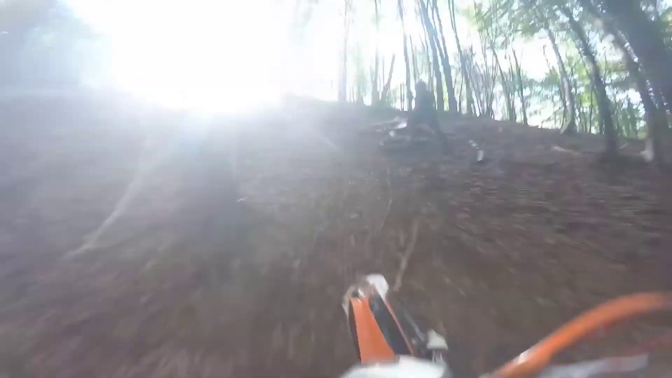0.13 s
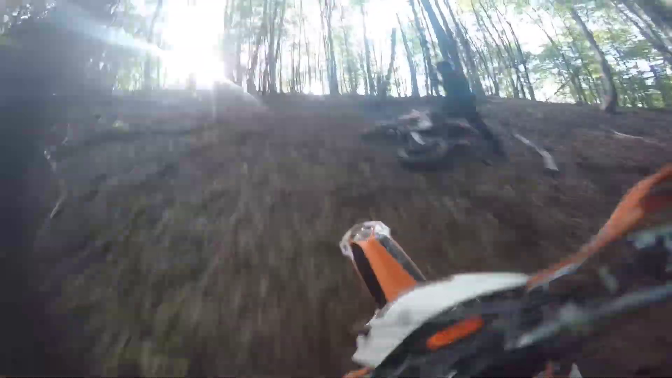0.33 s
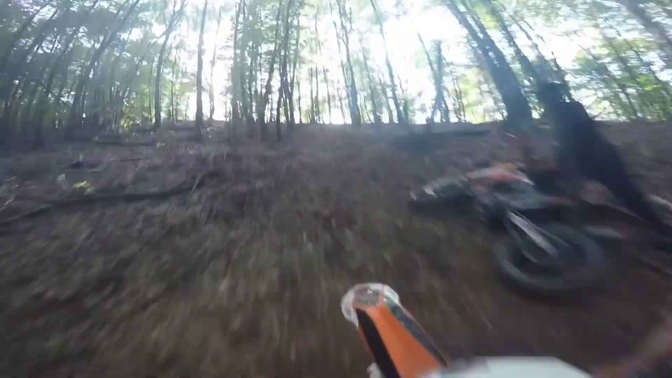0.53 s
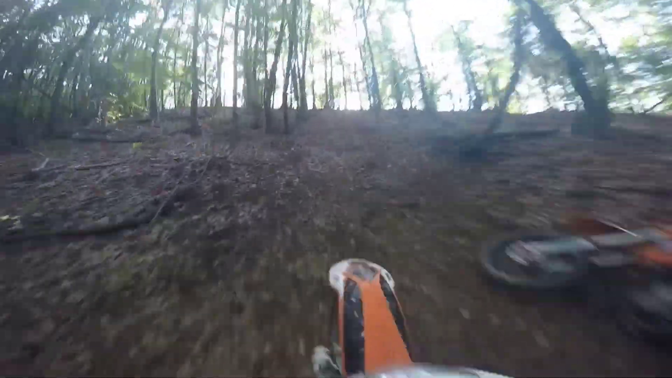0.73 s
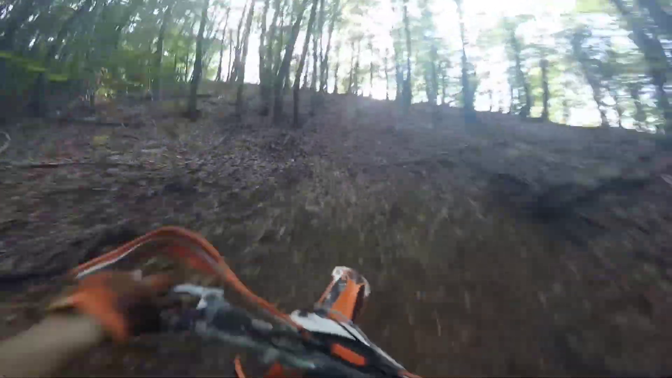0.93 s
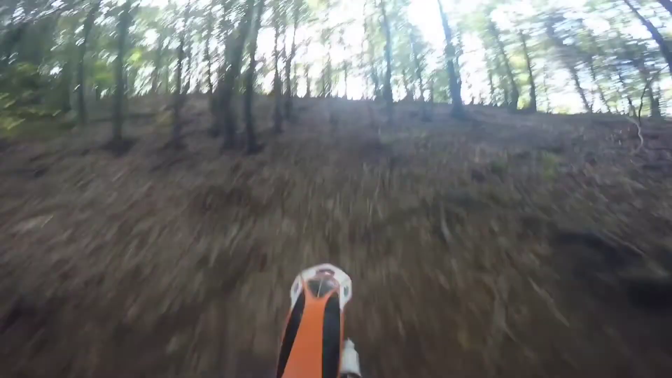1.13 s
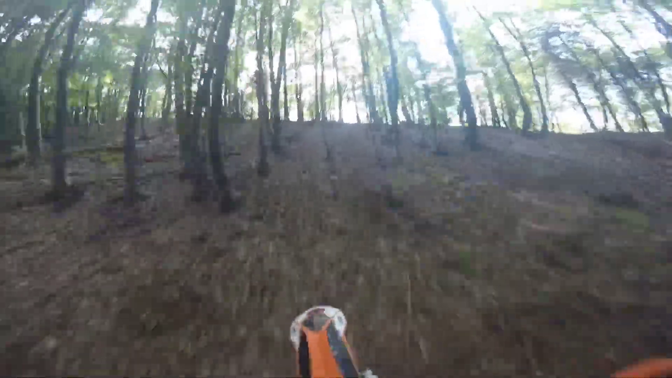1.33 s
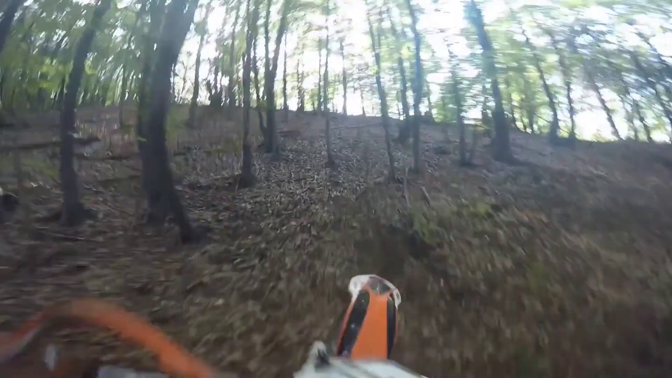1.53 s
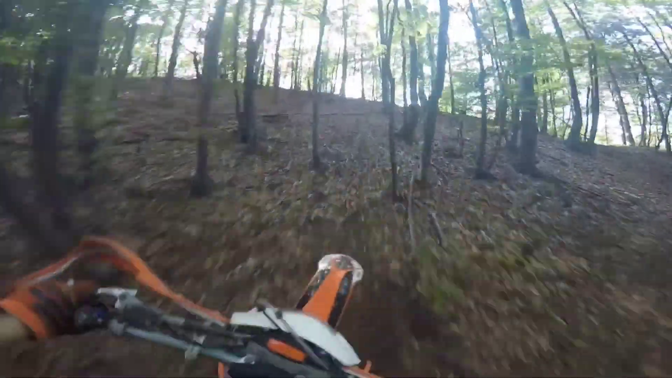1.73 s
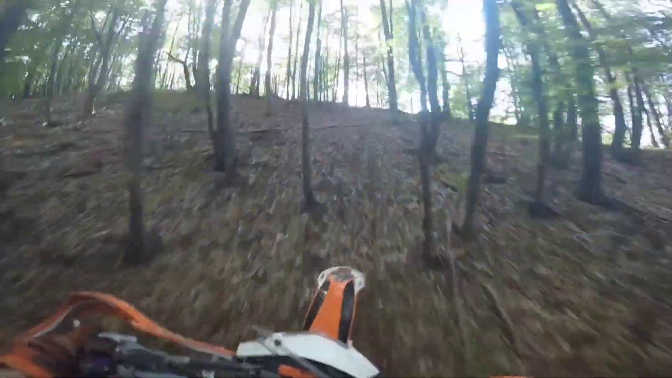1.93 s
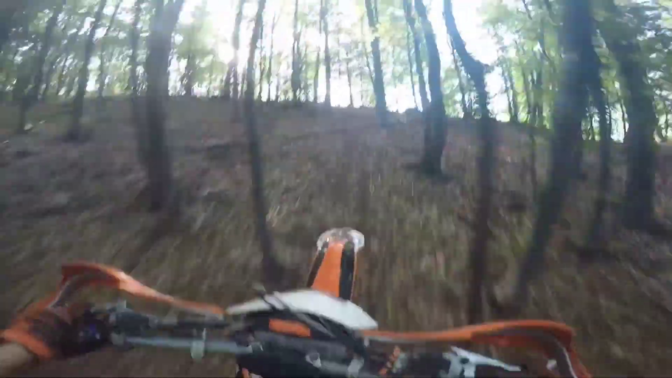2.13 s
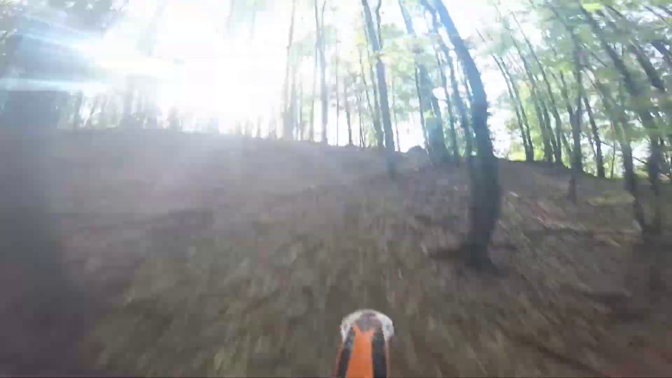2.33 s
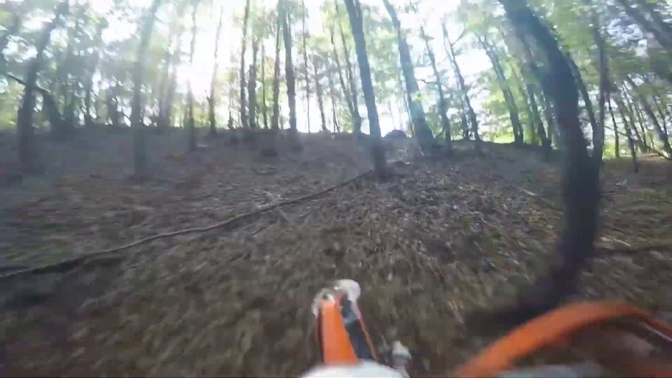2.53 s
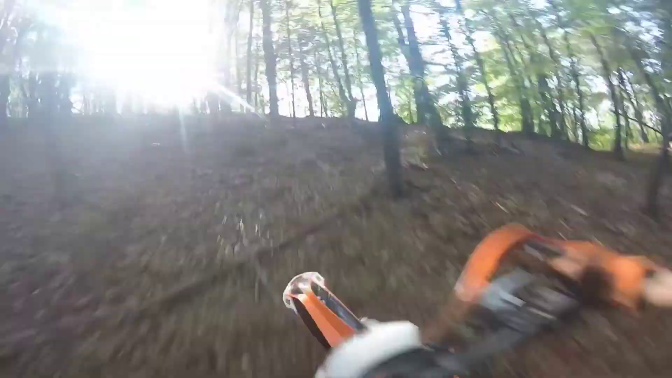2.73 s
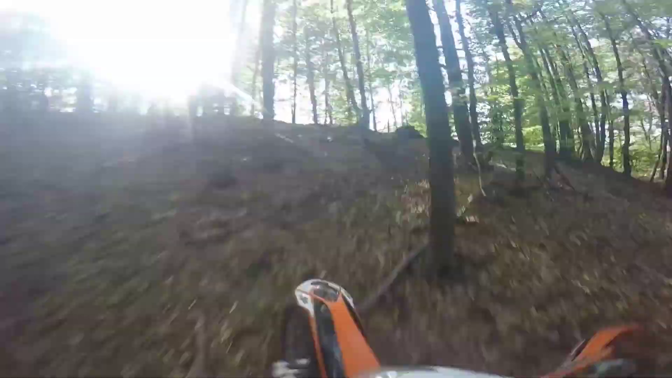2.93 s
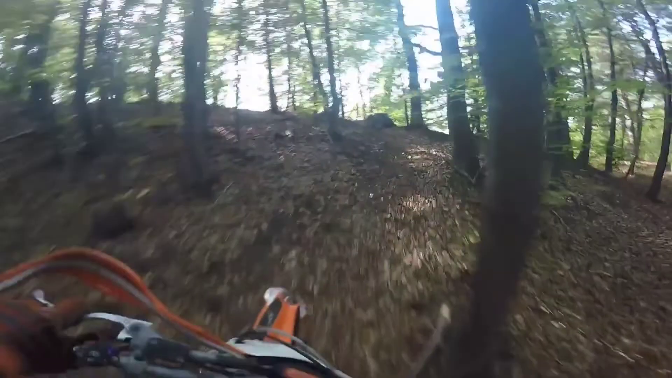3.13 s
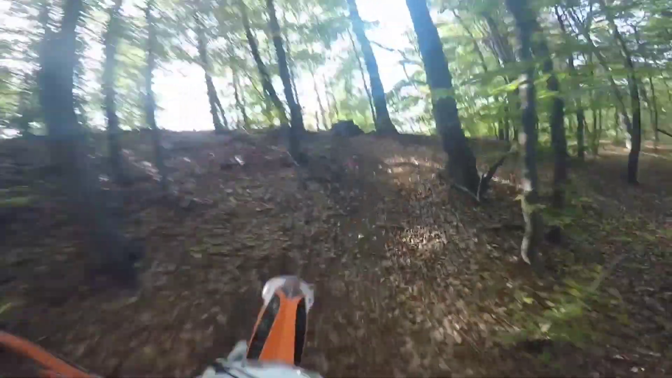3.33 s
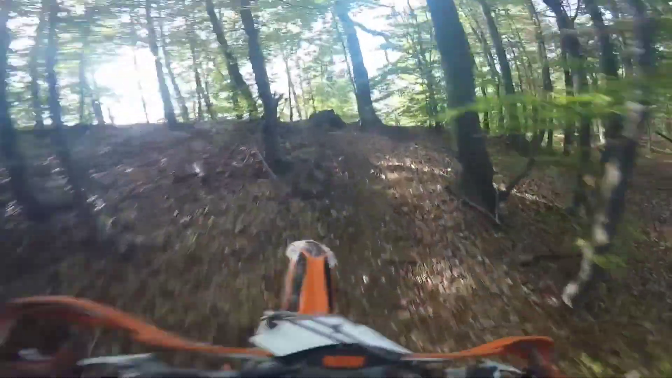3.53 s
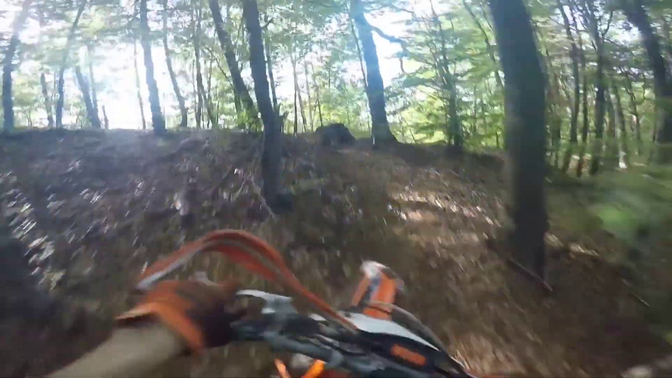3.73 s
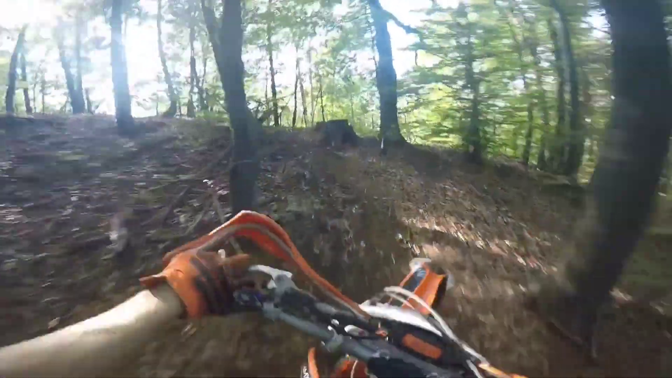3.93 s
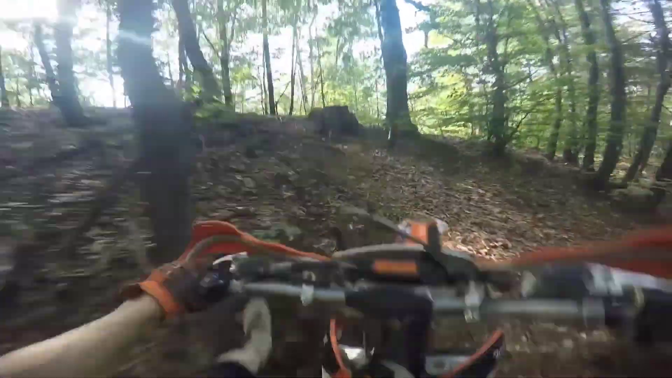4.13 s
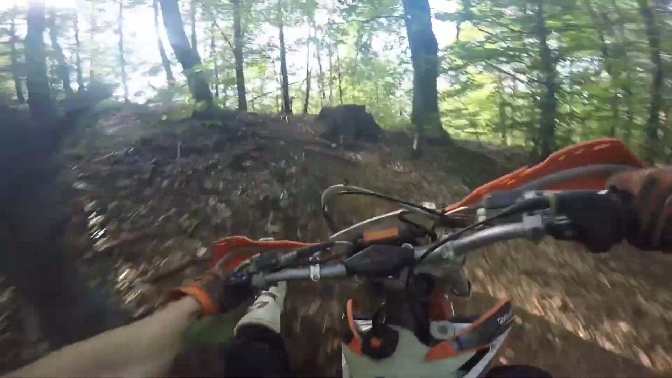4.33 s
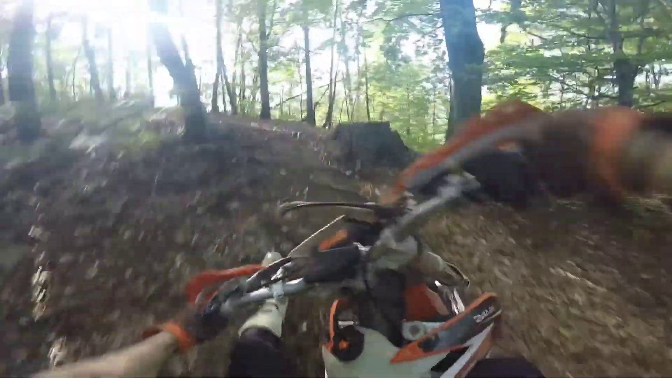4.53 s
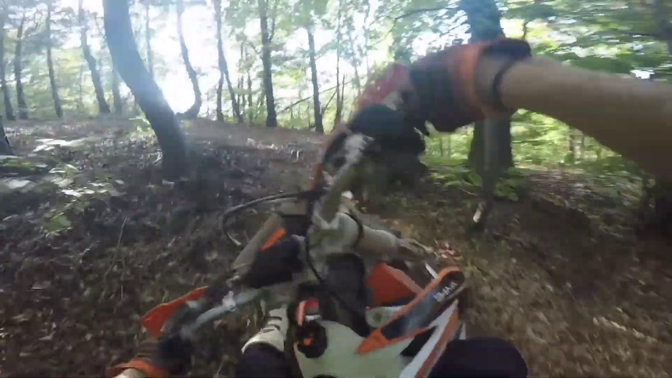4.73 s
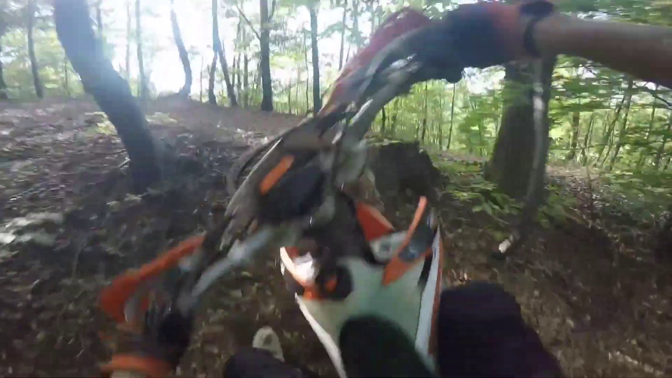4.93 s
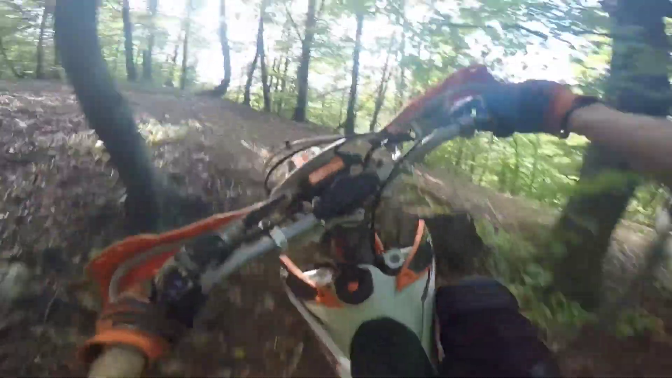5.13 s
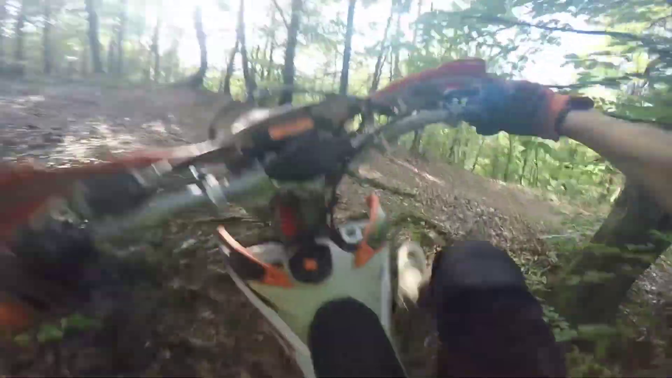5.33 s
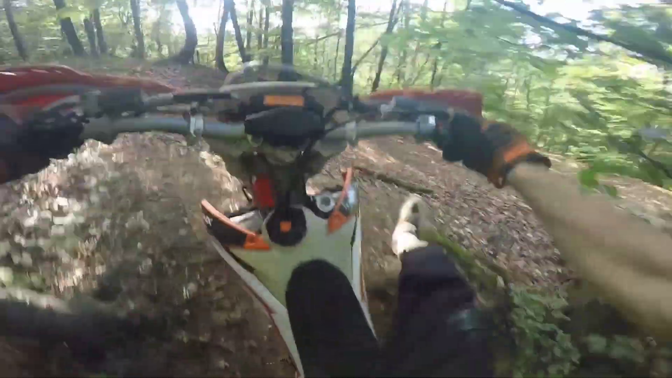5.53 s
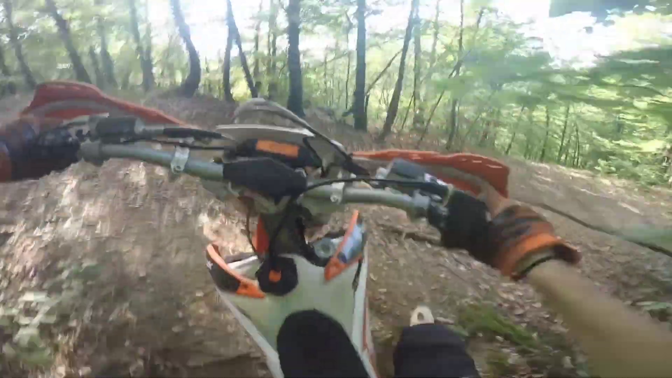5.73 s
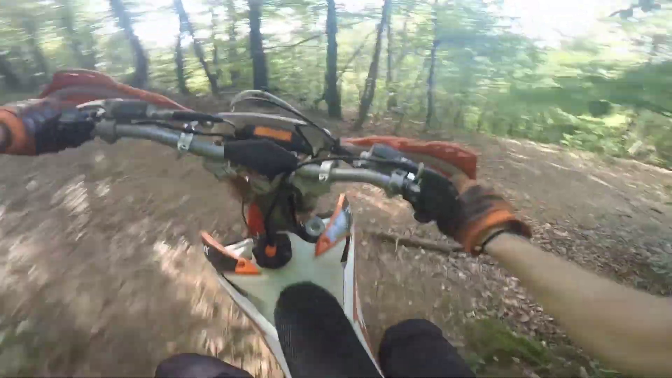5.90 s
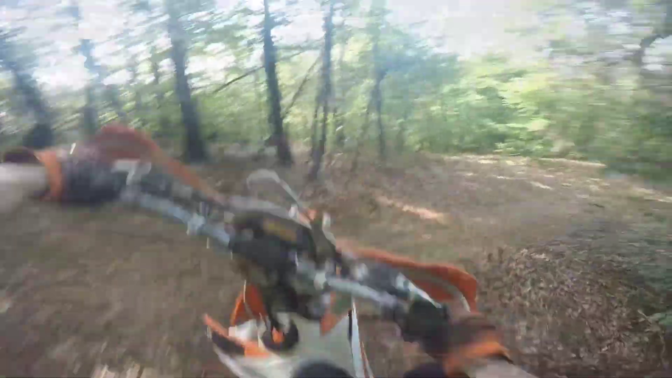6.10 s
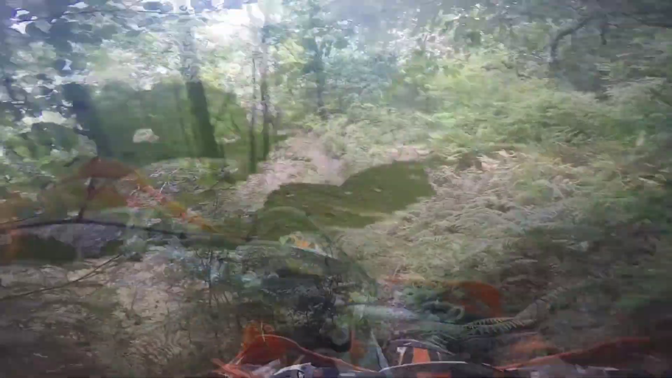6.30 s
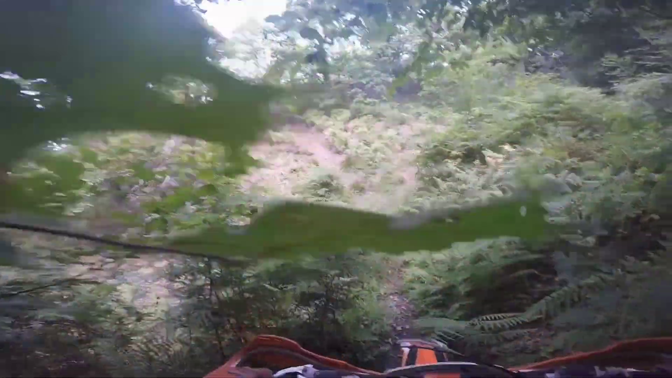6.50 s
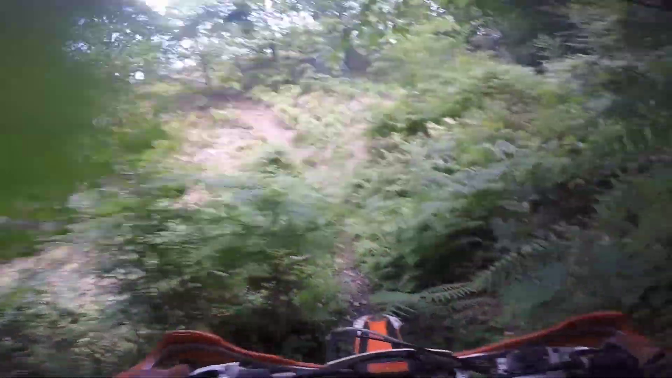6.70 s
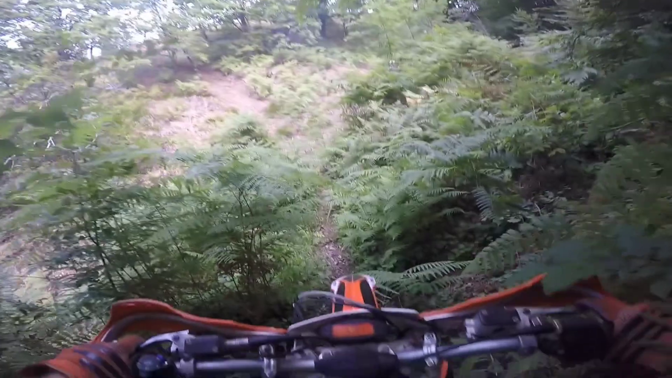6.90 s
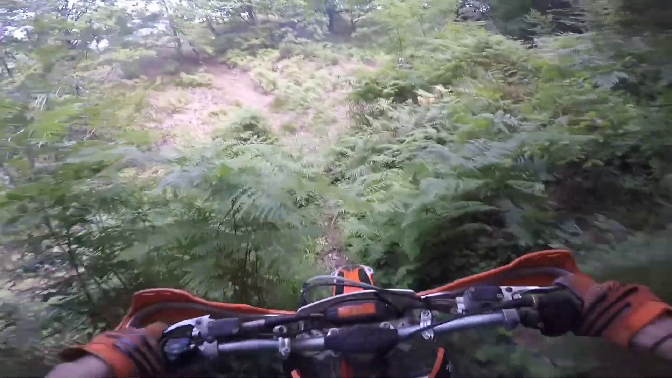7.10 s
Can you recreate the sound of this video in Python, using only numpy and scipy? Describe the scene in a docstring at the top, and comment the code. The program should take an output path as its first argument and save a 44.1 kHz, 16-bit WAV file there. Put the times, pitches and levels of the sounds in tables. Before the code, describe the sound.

Close, rough onboard sound of a small off-road motorcycle in the woods: a buzzing, screaming exhaust wavers up and down, then falls to slow, separate, rattling pops. Short bursts of throttle follow, with deep camera wobbles, plastic knocks and gritty crunches under the tyres. Finally the engine putters and blips again while foliage slaps and hisses on both sides.

```python
"""Two-stroke dirt bike on a wooded hill

A dirt bike climbs, heard from a camera on the rider's helmet. It revs in waves for three seconds,
drops to an uneven putter, bumps over the crest and rolls into ferns. Each firing sends a pulse into
the resonant exhaust pipe and strikes the expansion chamber and engine case, heard as filtered clicks
and noise. Air rumble and crank shake, damped swings and rings of the camera after bumps, gritty
bursts under the tyres and clouds of tiny leaf slaps make up the rest."""
import sys
import numpy as np
from scipy import signal
from scipy.fft import irfft
from scipy.io import wavfile
from scipy.ndimage import uniform_filter1d

SR = 44100
rng = np.random.default_rng(int(sys.argv[2]) if len(sys.argv) > 2 else 0)


def store_pcm(level_fs):
    """Save levels as 16-bit WAV."""
    pcm = np.round(np.clip(level_fs, -1, 1) * 32767).astype(np.int16)
    wavfile.write(sys.argv[1], SR, np.atleast_2d(pcm).T)


N = 320166
T = np.arange(N) / SR  # time of each sample, s
TAPS = 8192  # grid length for filter design
HZ = np.fft.rfftfreq(TAPS, 1 / SR)


def gain_of(db):
    """Level: converts decibels to an amplitude factor."""
    return 10 ** (np.asarray(db) / 20)


def curve(rows):
    """Linear interpolation: the second column of a timed table, at every sample."""
    rows = np.asarray(rows)
    return np.interp(T, rows[:, 0], rows[:, 1])


def add(mix, s, sound):
    """Superposition: adds a sound into the mix at time s."""
    part = mix[round(s * SR):][:len(sound)]
    part += sound[:len(part)]


def slope(points):
    """Spectral envelope: gain at each frequency from (Hz, dB) points."""
    hz, db = np.transpose(points)
    return gain_of(np.interp(np.log(HZ + 1), np.log(hz), db))


def bells(modes):
    """Resonance: steep-sided peaks summed in power, each with its width in Hz at half amplitude."""
    power = 0
    for hz, width, db in modes:
        power = power + gain_of(db) ** 2 / (1 + (2.0 * (HZ - hz) / width) ** 2) ** 2
    return np.sqrt(power)


def colour(x, gain, delay=0):
    """Minimum-phase filtering with a given gain, plus a group delay in s at each frequency."""
    log_gain = np.log(np.maximum(gain, 1e-5))
    # the Hilbert transform of the log gain gives the causal phase
    phase = -signal.hilbert(np.r_[log_gain, log_gain[-2:0:-1]]).imag[:len(HZ)]
    # phase is the running integral of group delay
    phase = phase - 2 * np.pi * np.cumsum(delay * np.ones(len(HZ))) * HZ[1]
    response = irfft(np.exp(log_gain + 1j * phase))[:TAPS // 2]
    return signal.oaconvolve(x, response)[:len(x)]


def evened(x):
    """Normalization: scales to rms 1."""
    return x / np.sqrt(np.mean(x ** 2) + 1e-20)


def steadied(x, lo, hi, size=3600):
    """Level control: divides by the slow rms of one band, so that another rule can set its level."""
    band = signal.butter(2, [lo, hi], "band", fs=SR, output="sos")
    power = signal.sosfilt(band, x) ** 2
    slow_power = uniform_filter1d(uniform_filter1d(power, size), size)
    return x / np.sqrt(abs(slow_power) + 1e-14)


def clicks(times, sizes):
    """Band-limited sampling: windowed-sinc impulses at times between samples."""
    at = np.round(times * SR).astype(int)[:, None] + np.arange(-8, 9)
    offset = at - times[:, None] * SR
    shapes = sizes[:, None] * np.sinc(offset) * np.cos(np.pi * offset / 18) ** 2
    return np.bincount(np.clip(at, 0, N).ravel(), shapes.ravel(), N + 1)[:N]


def lagged(x, seconds):
    """First-order relaxation: follows x with a time constant."""
    keep = np.exp(-1 / (seconds * SR))
    return x[0] + signal.lfilter([1 - keep], [1, -keep], x - x[0])


def ferns(per_s=800, spread_db=2.0):
    """Shot noise: many tiny random leaf slaps blend into a swish."""
    # fronds brushing the bike: time_s, level_db
    brushing = [(5.8,-92),(5.98,-64),(6.2,-50.5),(6.5,-48.5),(6.6,-43),(6.75,-35),(6.9,-42.5),(7.26,-41)]
    # spectral envelope of the leaves: frequency_hz, relative_level_db
    leaf_colour = [(400,14),(950,8.5),(1250,-1),(1650,12),(2200,-15),(4000,8),(5100,-27),(5700,14),(6400,-9),(12000,-2),(15000,-10)]
    struck = rng.random(N) < per_s / SR
    boost_db = spread_db * np.minimum(rng.exponential(1, N), 4)
    slaps = struck * rng.standard_normal(N) * gain_of(boost_db)
    return gain_of(curve(brushing)) * evened(colour(slaps, slope(leaf_colour)))


def crunches(t60=0.092, width_hz=950):
    """Fracture noise: stones and sticks give way in short, decaying, gritty bursts."""
    # stones and sticks under the tyres: start_s, relative_level_db, centre_hz
    breaks = [(5.196,-37,1280),(5.226,-41,1536),(5.268,-32.5,1075),(5.335,-50,1900),(5.896,-37.5,602),(5.925,-41,544),(5.99,-41,594),(6.01,-45,1510),(6.023,-40,1290),(6.064,-37.5,850),(6.077,-50,1200),(6.103,-41,890),(6.128,-51,1083),(6.728,-26.5,2640)]
    out, t = np.zeros(N), np.arange(SR // 8) / SR
    for s, db, hz in breaks:
        grit = rng.standard_normal(len(t)) * rng.exponential(1, len(t)) * gain_of(-60 * t / t60)
        burst = colour(grit, bells([(hz, width_hz, 0)]) * HZ / (HZ + 300))
        onset_rms = burst[:SR // 70].std()
        add(out, s, gain_of(db - 4.0) * burst / onset_rms)
    return out


def buffet(mount_hz=44, mount_width_hz=7):
    """Turbulence and resonance: air rumbles; near the camera mount's resonance crank shake joins in."""
    # air and frame shake on the helmet: time_s, level_db
    shaking = [(0,-16.5),(0.6,-18.5),(0.8,-25.5),(1.1,-14.5),(1.31,-35),(1.55,-29.5),(2.2,-22.5),(3.45,-22),(4.15,-21.5),(4.41,-15),(4.9,-20.5),(5.07,-31.5),(5.45,-20),(5.85,-21.5),(6.03,-42.5),(6.45,-26.5),(6.6,-29.5),(6.92,-30),(7.08,-25.5)]
    # spectral envelope of the air: frequency_hz, relative_level_db
    air_colour = [(10,-21),(22,6.5),(40,5),(55,-6.5),(75,-9.5),(110,-27.5),(200,-32.5),(400,-34),(900,-43.5),(3000,-88)]
    air = steadied(colour(rng.standard_normal(N), slope(air_colour)), 20, 120)
    shake = np.sqrt(2) * np.sin(2 * np.pi * np.cumsum(speed()) / SR)
    # the crank's share of the power
    share = np.clip(0.44 / (1 + ((speed() - mount_hz) / mount_width_hz) ** 4), 0, 1)
    return gain_of(curve(shaking)) * (np.sqrt(1 - share) * air + np.sqrt(share) * shake)


def jolts(rise_cycles=0.78, tail_db=-16, tail_cycles=11):
    """Damped oscillation: a bump sets the camera swinging on its mount for a few cycles."""
    # bumps that rock the camera: start_s, relative_level_db, ring_hz
    bumps = [(0.727,-2,37.18),(1.126,2,36.5),(1.128,-12.5,109),(2.448,-3,37),(3.389,1.5,35.7),(4.211,-3.5,44),(4.491,-8,41.9),(4.502,-2.5,119),(4.641,-11,39.8),(4.768,1,36.6),(4.914,3.5,37.3),(5.511,-31,43),(5.764,0,86),(5.768,2.5,38.3)]
    out, t = np.zeros(N), np.arange(SR // 3) / SR
    for s, db, hz in bumps:
        age = hz * t / rise_cycles
        surge = age ** 2 * np.exp(2 - 2 * age)
        tail = gain_of(tail_db - 60 * hz * t / tail_cycles)  # falls 60 dB in tail_cycles
        add(out, s, gain_of(db - 5.0) * (surge + tail) * np.sin(2 * np.pi * hz * t))
    return out


def knocks():
    """Modal ringing: short blows excite the plastic camera housing; each blow has its own brightness."""
    # hard knocks on the housing: start_s, peak_level_db, brightness_db_per_octave
    blows = [(1.131,-14,4),(4.505,-13.5,10.5),(4.527,-10,-19),(4.925,-12.5,-11),(5.531,-4.5,7.5),(5.761,-11.5,-2),(5.774,0.5,-4.5),(5.988,-20,1)]
    # modes of the housing: frequency_hz, relative_level_db, t60_s
    housing = [(94,-5,0.097),(138,8,0.063),(310,19.5,0.015),(557.8,-5,0.0095),(820,-10.5,0.015),(980,-16,0.034),(2600,-30,0.0077)]
    out, t = np.zeros(N), np.arange(SR // 6) / SR
    for s, db, bright in blows:
        ring = np.zeros(len(t))
        for hz, mode_db, t60 in housing:
            tilt_db = bright * np.log2(hz / 300)
            ring += gain_of(mode_db + tilt_db - 60 * t / t60) * np.sin(2 * np.pi * hz * t)
        add(out, s, -gain_of(db) * ring / abs(ring).max())
    return out


def speed(flywheel_s=0.04985):
    """Rotational inertia rounds off speed changes; crank turns per second, each with one firing."""
    # engine speed on the gas: time_s, firing_rate_hz
    revs = [(0.062, 141.8), (0.12, 150.5), (0.303, 135.9), (0.418, 161.6), (0.594, 171.2), (0.737, 114.6),
            (0.886, 135.7), (0.965, 163.8), (1.149, 171.8), (1.307, 119.6), (1.428, 152.3), (1.48, 143.3),
            (1.759, 173.7), (1.85, 174.4), (1.994, 126.1), (2.088, 127.0), (2.193, 160.4), (2.305, 170.3),
            (2.453, 126.9), (2.633, 154.2), (2.735, 167.7), (2.856, 165.0), (2.968, 118.0)]
    # engine speed near idle: time_s, firing_rate_hz
    putter = [(3.191,83),(3.42,69),(3.561,45),(3.97,78),(4.172,46),(4.469,47),(4.699,55),(4.859,61),(4.999,42),(5.482,34),(5.719,48),(5.9,39),(6.3,46),(6.631,60),(6.802,57),(7.019,36),(7.26,51)]
    size = max(1, round(flywheel_s * SR))
    return uniform_filter1d(curve(list(revs) + list(putter)), size, mode="nearest")


def load(open_s=0.05, shut_s=0.0067):
    """Asymmetric relaxation: the engine takes up load slowly and drops it quickly; gains in dB."""
    # spells on or off the throttle, against idle; below zero the bike coasts:
    # start_s, end_s, boom_db, bark_db, metal_db
    throttle = [(0,0.382,17,21,10),(0.38,0.54,17.5,17.5,8.5),(0.53,0.88,17,15.5,9.5),(0.887,1.15,15.5,20,8.5),(1.155,1.251,9.5,9.5,5.5),(1.283,1.53,8.5,13.5,3.5),(1.54,1.882,18,16.5,6),
                (1.878,2.77,15.5,20,9.5),(2.753,2.937,18,12.5,6.5),(2.943,3.227,5,5.5,7),(3.227,3.443,3.5,5,5.5),(3.54,3.953,15.5,18,3),(4.15,4.56,11,10.5,2.5),(4.573,4.9,11.5,20.5,5),
                (5.587,5.777,12.5,11,3),(5.816,6.0,0,9,-11.5),(6.01,6.55,-0.5,3.5,-4.5),(6.577,6.93,15,12,2),(6.947,7.06,8,10,4),(7.05,7.254,13,16,4.5)]
    asked = np.zeros((N, 3))
    for start, end, *dbs in throttle:
        asked[(T >= start - .005) & (T < end + .005)] = dbs
    return [np.minimum(lagged(db, open_s), lagged(db, shut_s)) for db in asked.T]


def firings():
    """Phase integration: one firing per crank turn, with the exhaust and clatter boost of each in dB."""
    # spells of harder or weaker firing: start_s, length_s, exhaust_boost_db, clatter_boost_db
    surges = [(2.905,.03,0,5.5),(2.968,.018,5,4),(3.076,.018,3,7),(3.134,.022,9,8),(3.191,.022,10.5,8),(3.258,.04,11.5,8.5),(3.327,.024,15,7),(3.388,.024,15,6.5),(4.17,.01,9.5,11),(4.214,.01,3,10),(4.259,.01,4,9),(4.362,.01,1,6),(4.428,.01,2,-1),(6.029,.01,7.5,11),(6.1,.01,-3,15),(6.146,.01,1.5,12.5),(6.184,.01,1,2),(6.296,.01,7,12),(6.347,.025,5,13),(6.41,.025,5.5,12),(6.505,.01,7,10),(6.562,.01,10,8)]
    turns = np.cumsum(speed()) / SR
    # bend the phase so that every surge starts on a firing
    starts = np.array(surges)[:, 0]
    turns -= np.interp(T, starts, np.unwrap(np.interp(starts, T, turns) % 1, period=1))
    times = np.interp(np.arange(np.ceil(turns[0]), turns[-1]), turns, T)
    boost_db = np.zeros((len(times), 2))
    for s, length, *dbs in surges:
        boost_db += np.outer((times > s - .002) & (times < s + length), dbs)
    return times, boost_db[:, 0], boost_db[:, 1]


def hollowed(x):
    """Spectral notch: a hollow in the exhaust tone, which lies lower at high revs than at idle."""
    versions = []
    # idling, then revving: centre Hz, half-width Hz, depth dB
    for hz, width, depth in [(489, 79, 4.4), (342.4, 44, 6.4)]:
        versions.append(colour(x, gain_of(-depth / (1 + ((HZ - hz) / width) ** 4))))
    idling, revving = versions
    share = np.clip((speed() - 80) / 40, 0, 1)
    return (1 - share) * idling + share * revving


def ground(x, delay_s=0.0038, delay_swing_s=0.00056, bounce_db=-14, swing_every_s=0.25):
    """Comb filtering: the trail returns a delayed copy; as the bike pitches, harmonics waver."""
    targets = rng.standard_normal(32)
    pitching = uniform_filter1d(np.interp(T, np.arange(32) * swing_every_s, targets), SR // 8)
    return x + gain_of(bounce_db) * np.interp(T - delay_s - delay_swing_s * pitching, T, x)


FULL_RATE_HZ = 150  # firing rate at which the engine's base levels hold


def exhaust(times, boost_db, boom_load_db, bark_load_db):
    """Pipe resonance: uneven pressure pulses and gas noise travel down the pipe and ring it."""
    # low muffler resonances: frequency_hz, width_hz, relative_level_db
    pipe = [(157,47,3),(222,50,0),(279.7,84,10),(332,155,1.5),(384.4,20,5)]
    # upper pipe resonances: frequency_hz, width_hz, relative_level_db
    upper_pipe = [(487,87,7.5),(564,63,2.5),(650,68,4.5),(719,54,-2),(817,120,-8.5),(1053,41,-5.5)]
    uneven_db, gas_db, bark_power = 1.5, -26, 1.22
    travel_s, sweep_s = 0.00289, 0.00616
    boom_base_db, bark_base_db, bark_db_per_octave = -40, -48.5, 2  # idle throttle, FULL_RATE_HZ

    force_db = boost_db + uneven_db * rng.standard_normal(len(times))
    pulses = clicks(times, gain_of(force_db))
    gas_level = np.sqrt(abs(uniform_filter1d(pulses ** 2, 600)))
    gas = gain_of(gas_db) * rng.standard_normal(N) * gas_level
    boom = colour(pulses + gas, bells(pipe) * HZ ** 2 / (HZ ** 2 + 110 ** 2), travel_s)

    # a stronger charge has a steeper front, so the bark grows faster than the boom
    fronts = clicks(times, gain_of(bark_power * force_db))
    # the bark's higher notes come out later
    delay = travel_s + sweep_s * np.clip((HZ - 300) / 450, 0, 1)
    bark = colour(fronts + gas, bells(upper_pipe) * HZ ** 4 / (HZ ** 4 + 380 ** 4), delay)

    boom_db = boom_base_db + boom_load_db
    bark_db = bark_base_db + bark_load_db + bark_db_per_octave * np.log2(speed() / FULL_RATE_HZ)
    return ground(hollowed(gain_of(boom_db) * evened(boom) + gain_of(bark_db) * evened(bark)))


def reflected(strikes, tone):
    """Multipath interference: the helmet sways through short reflections, so partials swell and fade."""
    sway_rate = np.interp(T, np.linspace(0, T[-1], 40), rng.uniform(2, 7, 40))
    sway = np.cumsum(sway_rate) / SR
    scream = 0
    for k in range(3):
        # a different delay in s at each frequency
        paths = .0025 + 0.001272 * evened(uniform_filter1d(rng.standard_normal(len(HZ)), 40))
        weight = np.sqrt(2 / 3) * np.cos(np.pi * (sway + k / 3))
        scream = scream + weight * colour(strikes, tone, paths)
    return scream


def metal(times, boost_db, modes, clean_db, clean_hz, ring_s, uneven_db):
    """Impact excitation: firings strike metal, leaving a rasp over a whirr; fast blows merge to a scream."""
    size = gain_of(boost_db + uneven_db * rng.standard_normal(len(times)))
    blows = clicks(times + 1.2e-5 * rng.standard_normal(len(times)), size)

    # each blow's power dies away over a steady whirr
    keep = np.exp(-1 / (ring_s * SR))
    power = signal.lfilter([1 - keep], [1, -keep], blows ** 2) + speed() / SR
    rasp = np.sqrt(power) * rng.standard_normal(N)

    body = bells(modes) * HZ ** 4 / (HZ ** 4 + 700 ** 4)
    tone = gain_of(clean_db) * body / (1 + (HZ / clean_hz) ** 2) * HZ ** 4 / (HZ ** 4 + 1150 ** 4)
    scream = reflected(blows * np.minimum(speed() / 150, 1) ** 0.77, tone)

    # at high revs the low rasp gives way to the scream
    smooth = np.clip((speed() - 90) / 50, 0, 1)
    low_rasp = signal.sosfilt(signal.butter(1, 2500, fs=SR, output="sos"), rasp)
    return scream + colour(rasp - .55 * smooth * low_rasp, body)


def spit(times, boost_db, level_db=-12, fade_s=0.015):
    """Amplitude-modulated noise: hard firings spit a bright hiss that starts at once and fades."""
    keep = np.exp(-1 / (fade_s * SR))
    power = signal.lfilter([1], [1, -keep], clicks(times, gain_of(boost_db) - 1) ** 2)
    hiss_colour = slope([(3000, -27), (6000, -9), (10000, 11), (15000, -5)])
    hiss = evened(colour(rng.standard_normal(N), hiss_colour))
    return gain_of(level_db) * np.sqrt(power) * hiss


def engine():
    """Common excitation: the same firings drive exhaust, chamber and case, scaled by speed and load."""
    # thin steel of the expansion chamber: frequency_hz, width_hz, relative_level_db
    chamber_modes = [(3554,550,2.5),(4110,620,-1.5)]
    # cylinder fins and engine case: frequency_hz, width_hz, relative_level_db
    case_modes = [(940,550,-8),(1417,127,-5),(1623,265,-3.5),(1940,200,-3),(2191,55,-2.5),(2604,276,0.5),(2780,110,3),(4180,2600,-6.5),(5490,606,-3),(6236,324,-4.5),(6790,740,-7.5),(7940,3000,-16),(10470,930,-18.5),(12300,2200,-20.5),(14300,1600,-26.5)]
    chamber_base_db, case_base_db, metal_db_per_octave = -30, -34.5, 7.5  # idle throttle, FULL_RATE_HZ
    crest_s, crest_fade_s, crest_db = 5.85, 0.2, -6.5

    times, pipe_db, clatter_db = firings()
    boom_load_db, bark_load_db, metal_load_db = load()
    metal_db = metal_load_db + metal_db_per_octave * np.log2(speed() / FULL_RATE_HZ)
    # past the crest the chamber's ring reaches the helmet more weakly
    past_crest = np.clip((T - crest_s) / crest_fade_s, 0, 1)
    chamber_db = chamber_base_db + metal_db + crest_db * past_crest
    case_db = case_base_db + metal_db

    chamber = metal(times, clatter_db, chamber_modes,
                    clean_db=7, clean_hz=3600, ring_s=0.01, uneven_db=2.5)
    case = metal(times, clatter_db, case_modes,
                 clean_db=7.5, clean_hz=2570, ring_s=0.0075, uneven_db=1.35)
    chamber = gain_of(chamber_db) * steadied(chamber, 3200, 4500)
    case = gain_of(case_db) * steadied(case, 5000, 14000)
    hiss = gain_of(case_db) * spit(times, clatter_db)
    return exhaust(times, pipe_db, boom_load_db, bark_load_db) + chamber + case + hiss


def scene():
    """Mid-side superposition: all is close and central, but the ferns also brush past on both sides."""
    mid = ferns() + crunches() + buffet() + jolts() + knocks() + engine()
    side_colour = slope([(3000, -61), (4500, -51), (6000, -23), (15000, 8)])
    side = gain_of(-1.5) * colour(ferns(), side_colour)
    return np.array([mid + side, mid - side])


def record(dry, ceiling=0.77, edge_hz=15350):
    """Saturation and band limiting: overload rounds off the loudest peaks, then a low-pass filter."""
    held = dry / (1 + (dry / ceiling) ** 8) ** (1 / 8)
    low_pass = signal.firwin(511, edge_hz, window=("kaiser", 9), fs=SR)
    return signal.oaconvolve(held, low_pass[None], "same", axes=1)


dry = scene()
out = record(dry)
store_pcm(out)
```